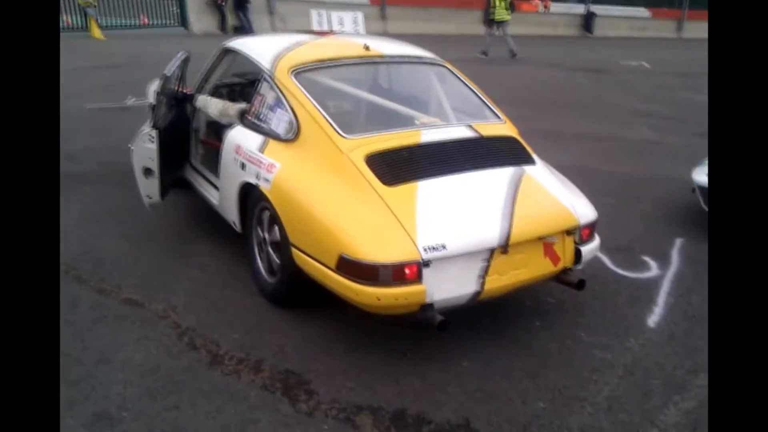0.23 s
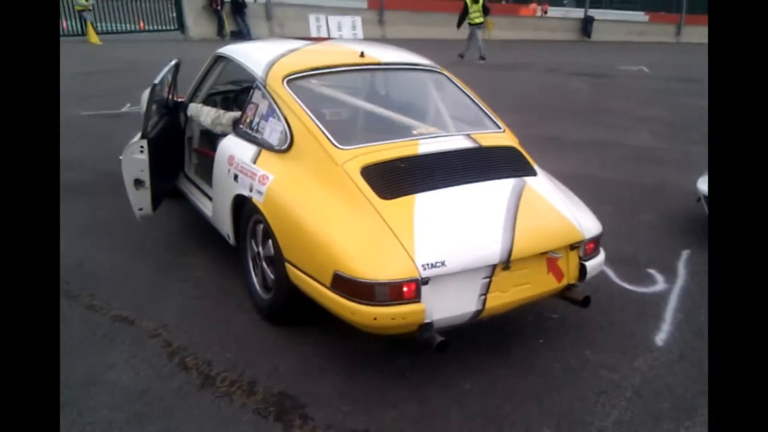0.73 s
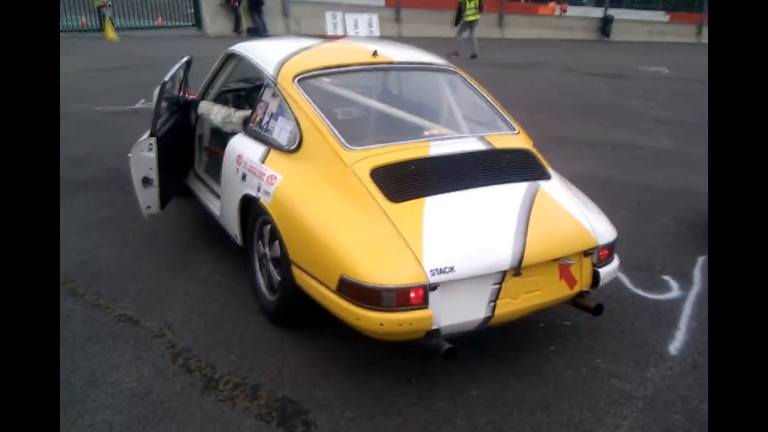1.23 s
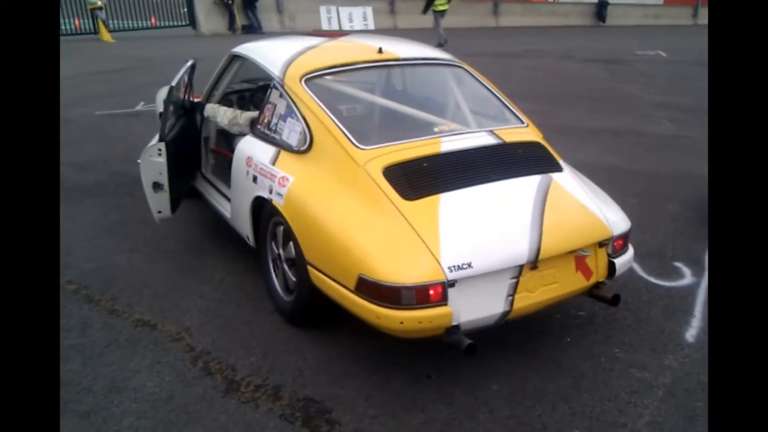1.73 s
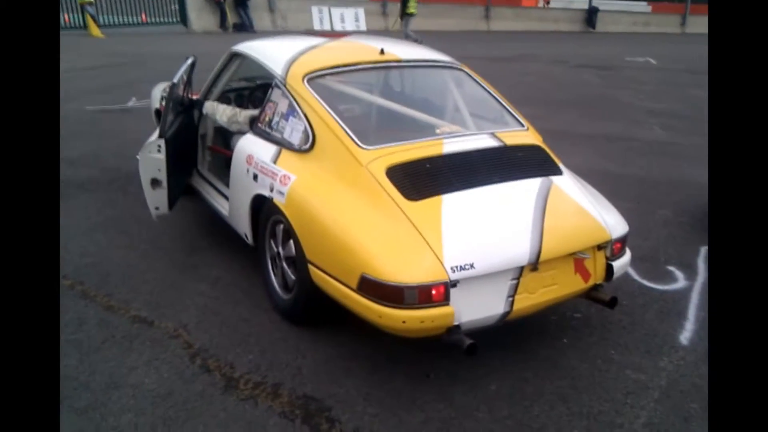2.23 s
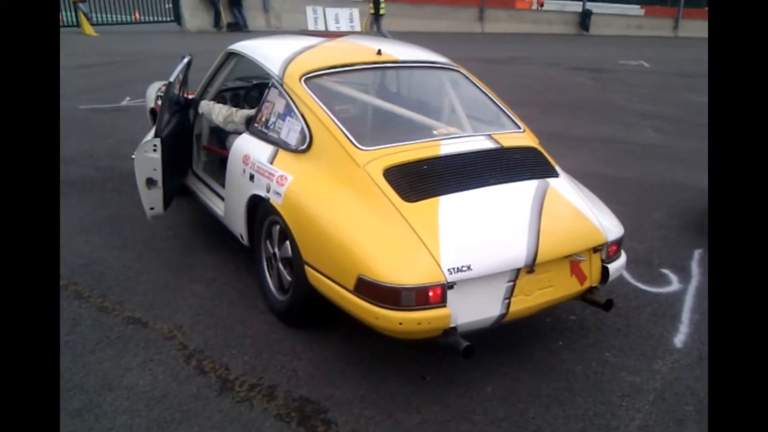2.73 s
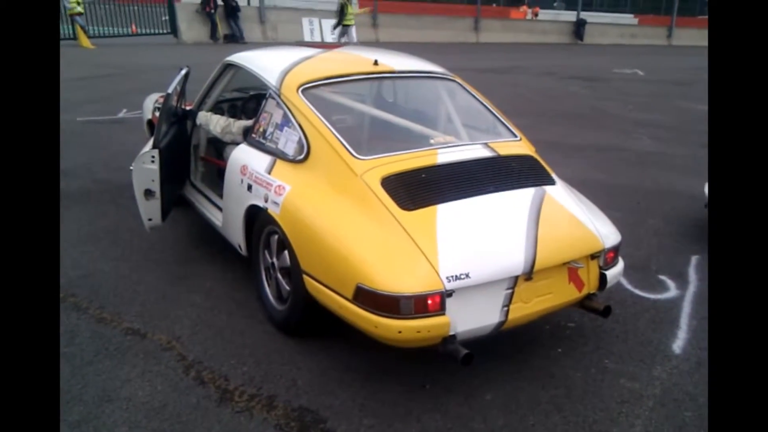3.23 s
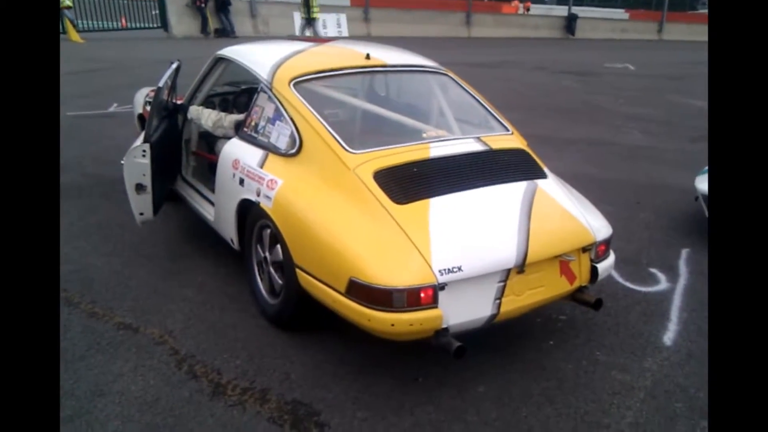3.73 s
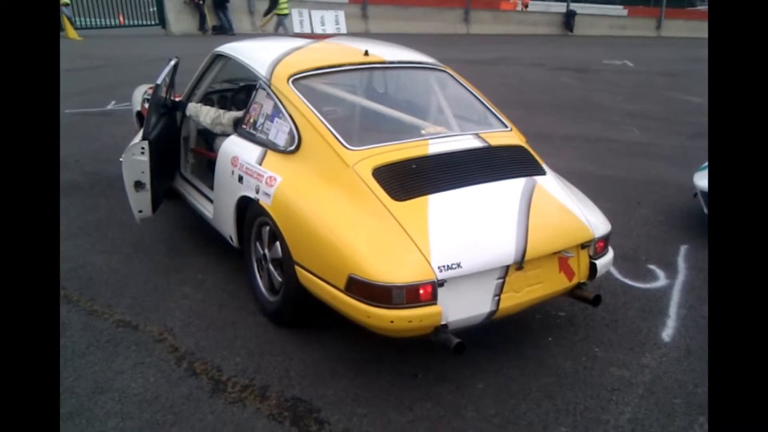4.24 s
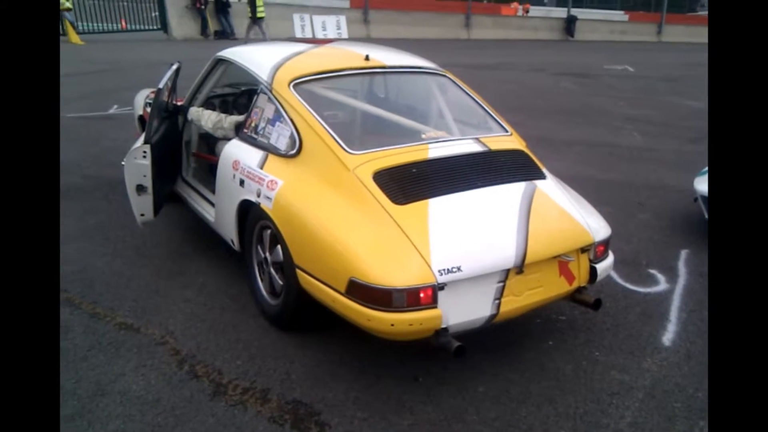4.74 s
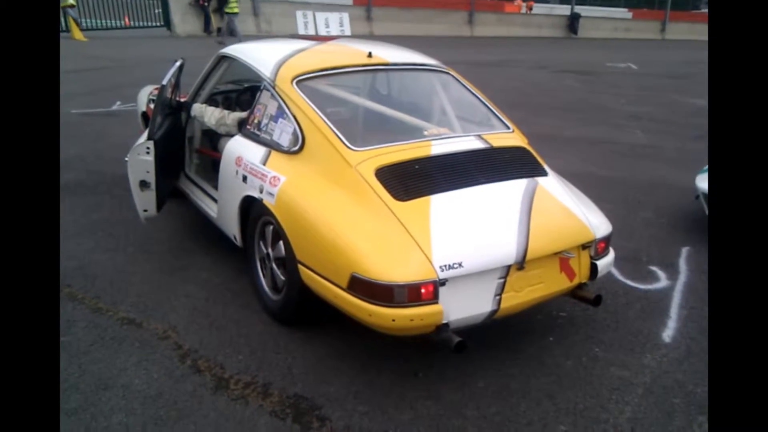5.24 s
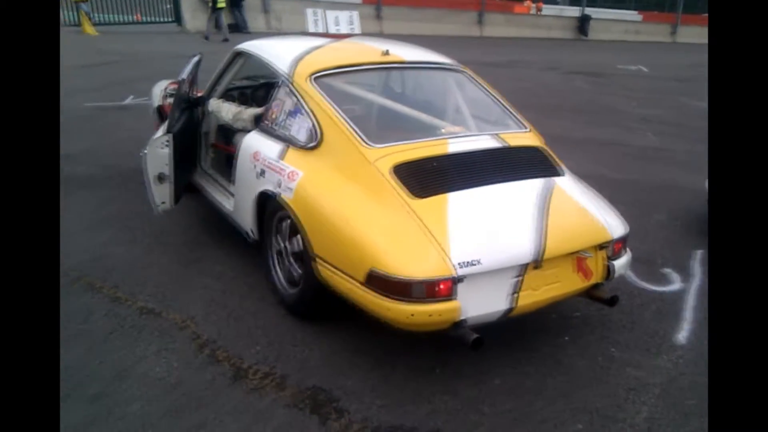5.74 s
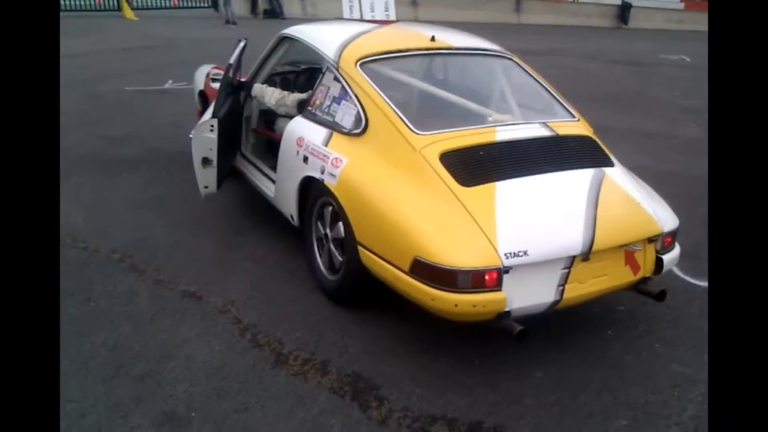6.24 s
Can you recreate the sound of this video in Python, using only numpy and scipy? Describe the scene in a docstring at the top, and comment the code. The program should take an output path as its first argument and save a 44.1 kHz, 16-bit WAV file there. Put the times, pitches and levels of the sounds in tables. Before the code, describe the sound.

Heard outdoors from a few metres behind a parked race car, its engine idles throughout with a low, burbling, slightly uneven exhaust pulse. Quick metallic ticking, a faint gear whine and steady fan noise lie on top. Early on the rattle grows and a thin rasp appears, slowly climbing in pitch. A few harder ticks poke out as the engine speed wavers and drops slightly.

```python
"""An air-cooled flat-six race engine idles fast on open tarmac, heard from a few metres behind the car. From
the start, six uneven exhaust pulses a cycle make a throbbing drone in which two cylinders stumble; gas puffs
out, tappets tick, and valves and timing gear ring the case over the rush of the cooling fan. Within a second
the valve covers rattle harder and a rasp comes up. The engine bay, fan and tappets together, swells at two
seconds, and the hardest tick follows soon after. By the end the rasp has climbed and the idle has sagged to
1500 rpm."""
import sys
import numpy as np
from scipy import signal
from scipy.fft import rfft, irfft
from scipy.io import wavfile
from scipy.ndimage import uniform_filter1d

SR = 44100
rng = np.random.default_rng(int(sys.argv[2]) if len(sys.argv) > 2 else 0)


def generate_wav(sig):
    """Save sig (samples, or channels by samples) to the path in sys.argv[1] as 16-bit PCM at SR."""
    pcm = np.round(np.clip(np.atleast_2d(sig).T, -1, 1) * 32767).astype(np.int16)
    wavfile.write(sys.argv[1], SR, pcm)


N = 286650
TIME = np.arange(N) / SR


# the cylinders in firing order: (exhaust pulse angle [crank degrees], pulse level [dB], stumble [dB])
FIRING_ORDER = [(26, -3.9, 0), (143, -5.8, -10), (246, 2.8, -13), (336, -2.9, -2), (477, -.1, -8),
                (546, -3.5, -12)]
# the drone's harmonics: (multiple of the four-stroke cycle rate, rms level at MIDDLE_RPM [dB])
HARMONICS = [(2, -62), (3, -46.5), (4, -31.8), (5, -40), (6, -15.2), (7, -37.5), (8, -33.3), (9, -29.7),
             (10, -32.6), (11, -42.7), (12, -32.6), (13, -41.4), (15, -29.5), (16, -43.9), (18, -35.4),
             (19, -32.9), (20, -45.8), (21, -30.8), (22, -50.5), (24, -47.2), (25, -43), (27, -35.3),
             (30, -47), (33, -51), (34, -49.2), (36, -50.5), (40, -52), (52, -49), (56, -49), (84, -48)]
# revs fill the low mids and thin the top: (frequency [Hz], boost [dB per 100 rpm])
REV_EQ = [(78, -1), (170, 4.5), (205, 9.5), (250, 1), (275, -2), (350, -7), (430, -1.5), (520, -9),
          (1080, -6)]
MIDDLE_RPM = 1550

def exhaust_drone(cycle, rpm, echo_db=-2.1, echo_degrees=57, waver=.002):
    """The body of the sound: harmonics phased by the six pulses and their echo off the open pipe end."""
    degrees, pulse_db, _ = np.transpose(FIRING_ORDER)
    lope = from_db(0.25 * drift(8))   # some cycles burn a little stronger than others
    out, hundreds_faster = np.zeros(N), (rpm - MIDDLE_RPM) / 100
    for multiple, db in HARMONICS:
        per_degree = -2j * np.pi * multiple / 720
        pulses = np.sum(from_db(pulse_db) * np.exp(per_degree * degrees))
        echo = from_db(echo_db) * np.exp(per_degree * echo_degrees)
        phase = np.angle(pulses / (1 + echo))
        # as the speed changes, each harmonic slides onto or off a pipe resonance
        slope_db = np.interp(multiple * MIDDLE_RPM / 120, *np.transpose(REV_EQ))
        gain = np.sqrt(2) * from_db(db + slope_db * hundreds_faster)
        wobble = 1 + waver * multiple * drift(0.76)   # upper harmonics waver more
        out -= gain * wobble * np.cos(2 * np.pi * multiple * cycle + phase)
    return lope * out


# the boom of the exhaust pipes: (frequency [Hz], width [Hz], relative level [dB])
PIPE_MODES = [(40, 22, -8), (60.5, 27, -1), (84.7, 22, 1), (138.7, 34.5, -7.5), (179.8, 53, -9),
              (232.5, 45, -7), (350, 59, -16.5)]

def burble(cycle, rebound=0.63, band_hz=(27.2, 450)):
    """Two cylinders stumble more than the rest; the surplus or lack of each firing rings the pipes."""
    kicks, cycle_index = 0, np.maximum(cycle, 0).astype(int)
    for angle, _, stumble_db in FIRING_ORDER:
        chance = rng.standard_normal(cycle_index[-1] + 1)
        burns = signal.lfilter([1], [1, rebound], chance)   # a poor burn tends to follow a good one
        surplus = np.tanh(.5 * rms_one(burns))
        firings = strikes(cycle, np.array([angle]), stumble_db, scatter_db=1, slop_degrees=3)
        kicks = kicks + surplus[cycle_index] * firings
    rumble = resonate(kicks, PIPE_MODES)
    return rms_one(signal.sosfilt(signal.butter(2, band_hz, "band", fs=SR, output="sos"), rumble))


# the chuffing rhythm of one cycle: (angle [crank degrees], accent [dB])
PUFF_PATTERN = [(25, -5.5), (104, -1), (180, -2.5), (258, 0), (348, -1.5), (420, -2.5), (480, -1),
                (590, -3.5), (645, 0)]
# the breathy tone of the tailpipes: (frequency [Hz], relative level [dB])
GAS_EQ = [(250, -7), (420, 1.5), (520, -8.5), (660, 0), (800, -1), (970, -5), (1110, 4), (1260, -9.5),
          (1400, -10.5), (1650, -8), (1900, -12.5), (2500, -17.5), (3300, -21), (5000, -36)]

def gas_rush(cycle, steady_hiss=.2):
    """Turbulence puffs out as the exhaust pulses and their echoes leave the pipes."""
    degrees, db = np.transpose(PUFF_PATTERN)
    pulses = strikes(cycle, degrees, db, scatter_db=1.5, slop_degrees=3)
    puffs = bursts(pulses, rise_s=0.00092, decay_s=0.0031)
    return colour(puffs + steady_hiss * rng.standard_normal(N), GAS_EQ)


# the valve gear's rhythm in one cycle: (angle [crank degrees], accent [dB])
KNOCK_PATTERN = [(54, 0.5), (163, 1), (230, 3), (345, 2), (425, 0), (471, 0), (508, 0), (598, 0.5),
                 (684, 0)]
# the ring of crankcase, valve covers and engine tin: (frequency [Hz], width [Hz], relative level [dB])
CASE_MODES = [(432, 56.4, -8), (506.3, 13, -10), (593, 13.9, -2), (659, 19, -1.5), (709.6, 24, -3.5),
              (813, 26, -6.5), (905, 23, -12.5), (1020, 22, -6.5), (1078, 20, -1), (1150, 197, -10),
              (1215, 38, -5), (1277, 24, -7), (1466, 24, -10.5), (1567, 14, -9), (1842, 106, -13.5),
              (1950, 120, -18), (2336, 52, -17), (2714, 13, -16.5), (3050, 35, -18.5), (3250, 17, -20.5)]
# faders for the clatter: (time [s], case ring level [dB], cover rattle level [dB])
CLATTER_FADERS = [(0, -37.5, -52), (0.35, -36.5, -54), (0.7, -36, -44.5), (1.05, -36.5, -41.5),
                  (1.45, -35, -47), (2.1, -37, -43.5), (2.8, -36, -45.5), (3.5, -35, -44.5),
                  (4.0, -36.5, -48), (5.0, -33.5, -46), (5.6, -34, -45.5), (6.5, -37.5, -45.5)]

def valve_clatter(cycle, cover_hz=1958, cover_width_hz=360):
    """Valves open and seat at fixed crank angles: the case rings and the thin covers rattle."""
    degrees, db = np.transpose(KNOCK_PATTERN)
    case_db, cover_db = in_time(CLATTER_FADERS)
    knocks = strikes(cycle, degrees, db, scatter_db=2.0, slop_degrees=1.2)
    ring = hold_level(resonate(knocks, CASE_MODES), samples=10000)
    rattle = ring_band(bursts(knocks, rise_s=.0006, decay_s=.0016), cover_hz, cover_width_hz)
    return from_db(case_db) * ring + from_db(cover_db) * rattle


# fader for the gear whine: (time [s], level [dB])
WHINE_FADER = [(0, -41), (0.7, -38), (1.3, -40), (2.0, -42.5), (2.9, -38.5), (4.3, -39.5), (5.2, -38),
               (5.9, -38), (6.5, -45.5)]

def gear_whine(cycle, crank_teeth=35, mate_teeth=60, swing_radians=1.33, hz=901.7, width_hz=19):
    """Timing gear teeth, early and late by turns as the mate runs off centre, sing through a case mode."""
    tooth_phase = 2 * np.pi * crank_teeth * 2 * cycle
    mesh = np.sin(tooth_phase + swing_radians * np.sin(tooth_phase / mate_teeth))
    tone = resonate(mesh, [(hz, width_hz, 0)])
    db, = in_time(WHINE_FADER)
    return from_db(db) * hold_level(tone, samples=4000)


# the bright bands the tappets ring in: (frequency [Hz], width [Hz], relative level [dB])
TICK_BANDS = [(1944, 330, 0.5), (2980, 900, 0), (4123, 350, -0.5), (5353, 880, -1.95), (10450, 1100, -25.5),
              (12000, 1200, -41)]
# one row a tappet: (angle [crank degrees], then a send into each of the six bands [dB])
TICK_PATTERN = [(80, 5.5, -7.5, -3, -2.5, -2.5, -0.5), (210, -2, 3.5, -5, 1, -0.5, 0),
                (322, 0.5, -7.5, -4.5, -7.5, -4.5, -4), (447, -3.5, -0.5, -7.5, -5.5, -4, -3),
                (565, 3.5, 3, 0, -2, -5, -1), (687, 4.5, -2, -9.5, -11.5, -6, -7)]

def tappets(cycle, tail_db=-5.5, force_spread_db=1.5):
    """Each loose tappet gives a short gritty tick of its own colour, which rattles on in the engine bay."""
    degrees, *sends_db = np.transpose(TICK_PATTERN)
    out, force = 0, from_db(force_spread_db * drift(50))   # a harder blow is louder in every band
    for (hz, width, db), send_db in zip(TICK_BANDS, sends_db):
        blows = force * strikes(cycle, degrees, send_db, scatter_db=1.3, slop_degrees=1.3)
        tick = bursts(blows, rise_s=0.0009, decay_s=0.0011)
        tail = from_db(tail_db) * bursts(blows, rise_s=0.006, decay_s=0.0033)
        out = out + from_db(db) * ring_band(tick + tail, hz, width)
    return rms_one(out)


# spot ticks that poke out of the mix: (time [s], relative peak level [dB], pitch [Hz])
TICK_CUES = [(0.2862, -28, 4200), (0.5906, -31, 4160), (0.7682, -31, 5430), (1.3635, -28, 5280),
             (2.06, -27, 4200), (2.4967, -28, 3900), (2.6512, -21, 3970), (2.7551, -28, 4100),
             (3.398, -25, 5650), (3.4748, -25, 5300), (3.6145, -29, 5250), (3.9624, -28, 4200),
             (4.1135, -27.5, 4200), (4.1649, -27, 5300), (5.49, -28, 5350)]

def hard_ticks(decay_s=0.00043, width_hz=560):
    """Now and then a tappet lands harder and rings around one pitch."""
    out, age = np.zeros(N), TIME[:SR // 20] / decay_s
    envelope = age * np.exp(-age)
    for s, db, hz in TICK_CUES:
        tick = ring_band(envelope * rng.standard_normal(len(age)), hz, width_hz)
        start = int(s * SR)
        out[start:start + len(age)] += from_db(db) * tick / np.abs(tick).max()
    return out


# the sweep of the rasp: (time [s], centre [Hz], level [dB])
RASP_SWEEP = [(0, 1100, -61), (1.0, 1120, -44.5), (1.7, 1130, -42.5), (2.4, 1280, -45), (3.1, 1210, -39.5),
              (3.8, 1300, -44.5), (4.4, 1450, -45.5), (4.9, 1480, -44.5), (5.6, 1500, -46.5),
              (6.5, 1570, -44.5)]

def rasp(width_hz=170):
    """A narrow band of the engine's roar stands out and slides in pitch."""
    hz, db = in_time(RASP_SWEEP)
    grain = signal.sosfilt(signal.butter(2, width_hz / 2, fs=SR, output="sos"), rng.standard_normal(N))
    carrier = np.sin(2 * np.pi * np.cumsum(hz) / SR)
    return from_db(db) * rms_one(grain * carrier)


# the tone of the broad rushing noise under the engine, fading away in the treble:
# (frequency [Hz], relative level [dB])
BED_EQ = [(25, -13.5), (45, -2), (200, -0.5), (500, 2.5), (1100, 4.5), (1500, -2.5), (2000, -1), (2500, -5),
          (3100, -8), (3700, -11), (4700, -25.5), (5200, -14.5), (5900, -21.5), (6300, -36), (6950, -47),
          (7400, -70.5), (8700, -77), (10300, -51.5), (11500, -72), (15000, -91.5)]

def cooling_fan():
    """The fan lays a broad bed of rushing noise under the engine."""
    return colour(rng.standard_normal(N), BED_EQ)


def from_db(db):
    """Decibels to gain."""
    return 10 ** (np.asarray(db) / 20)


def rms_one(x):
    """Scale to unit rms."""
    return x / np.sqrt(np.mean(x ** 2) + 1e-20)


def hold_level(x, samples):
    """Ride the gain to hold the rms at 1 over a sliding window."""
    return x / np.sqrt(uniform_filter1d(x ** 2, size=samples) + 1e-9)


def in_time(rows):
    """Each column of an automation curve at every sample."""
    s, *columns = np.transpose(rows)
    return [np.interp(TIME, s, c) for c in columns]


def drift(rate_hz):
    """A random wander, mostly slower than rate_hz; rms 1."""
    hz = np.arange(N // 2 + 1) * SR / N
    return rms_one(irfft(rfft(rng.standard_normal(N)) / (1 + (hz / rate_hz) ** 2), N))


def colour(x, eq):
    """Shape x with a smooth EQ curve; rms 1."""
    hz, db = np.transpose(eq)
    log_hz = np.log(np.arange(1, N // 2 + 2) * SR / N)
    gain = from_db(np.interp(log_hz, np.log(hz), db, left=-60, right=-60))
    return rms_one(irfft(rfft(x) * gain, N))


def resonate(x, modes):
    """Parallel resonators of alternating polarity; rms 1."""
    out = 0
    for k, (hz, width, db) in enumerate(modes):
        radius = np.exp(-np.pi * width / SR)
        feedback = [1, -2 * radius * np.cos(2 * np.pi * hz / SR), radius ** 2]
        ring = signal.lfilter(np.array([1, 0, -1]) * (1 - radius ** 2) / 2, feedback, x + 1e-18)
        out = out + from_db(db) * ring * (-1) ** k
    return rms_one(out)


def ring_band(x, hz, width):
    """A broad, flat-topped band, like a cluster of modes; rms 1."""
    edges = np.clip([hz - width / 2, hz + width / 2], 20, .45 * SR)
    return rms_one(signal.sosfilt(signal.butter(4, edges, "band", fs=SR, output="sos"), x + 1e-18))


def strikes(cycle, degrees, db, scatter_db, slop_degrees):
    """One click a cycle at each crank angle, a little different in time and strength every round."""
    shape = (int(cycle[-1]) + 1, len(degrees))
    angles = degrees + slop_degrees * rng.standard_normal(shape)
    when = np.arange(shape[0])[:, None] + angles / 720
    gain = from_db(db + scatter_db * rng.standard_normal(shape))
    at = np.searchsorted(cycle, when.ravel())
    return np.bincount(at, gain.ravel() * (at > 0), N + 1)[:N]


def bursts(clicks, rise_s, decay_s):
    """Each click opens a short puff of noise; rms 1."""
    envelope = clicks
    for seconds in (rise_s, decay_s):
        envelope = signal.lfilter([1], [1, -np.exp(-1 / (seconds * SR))], envelope)
    return rms_one(envelope * rng.standard_normal(N))


# the idle, hunting a little as it sags: (time [s], crank speed [rpm])
IDLE_SPEED = [(0.0, 1619), (0.2, 1571), (0.97, 1584), (1.44, 1570), (1.81, 1590), (2.31, 1551),
              (2.83, 1546), (3.17, 1508), (3.56, 1564), (4.1, 1570), (4.7, 1524), (5.01, 1539),
              (5.77, 1531), (6.5, 1497)]
# the engine bay swells and eases off, a group fader for fan and tappets: (time [s], relative level [dB])
BAY_FADER = [(0, -1), (0.7, 0.5), (1.6, -1.2), (2.0, 1.9), (3.5, 0.8), (4.6, 0.1), (6.5, -1.2)]

def scene():
    """The mix: the crank clocks exhaust, valves and gears, with rasp and fan behind them."""
    rpm, = in_time(IDLE_SPEED)
    bay_db, = in_time(BAY_FADER)
    cycle = np.cumsum(rpm) / (120 * SR)   # four-stroke cycles so far, 720 crank degrees each
    cycle = cycle + .0007 * drift(6)   # the crank runs slightly unevenly
    drone = exhaust_drone(cycle, rpm)
    rumble = from_db(-26.5) * burble(cycle)
    gas = from_db(-35.5) * gas_rush(cycle)
    fan = from_db(-35.5 + bay_db) * cooling_fan()
    metal = valve_clatter(cycle) + gear_whine(cycle)
    ticks = from_db(-45.5 + 1.3 * bay_db) * tappets(cycle)
    accents = from_db(-5.5) * hard_ticks()
    return (drone + rumble + gas + metal + ticks + accents + rasp() + fan)[None]


def record(dry):
    """The microphone loses the deepest bass; the top is cut steeply at 15.4 kHz."""
    low_cut = signal.sosfilt(signal.butter(1, 4, "high", fs=SR, output="sos"), dry)
    return signal.sosfilt(signal.ellip(10, .1, 80, 15400, fs=SR, output="sos"), low_cut)


dry = scene()
out = record(dry)
generate_wav(out)
```